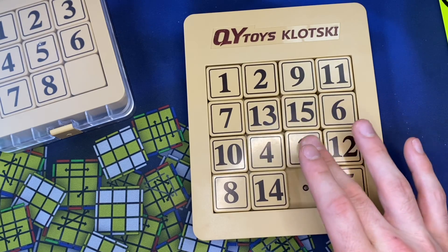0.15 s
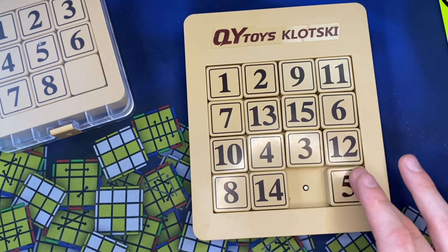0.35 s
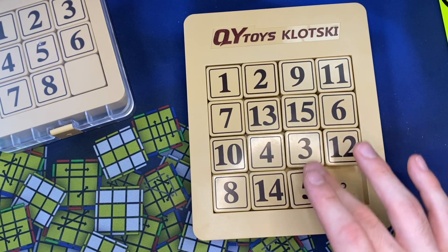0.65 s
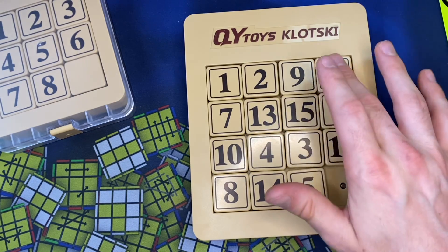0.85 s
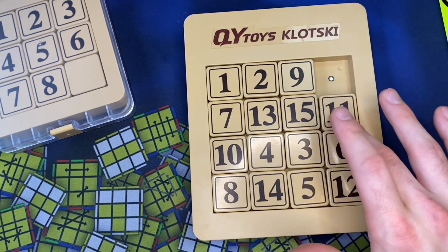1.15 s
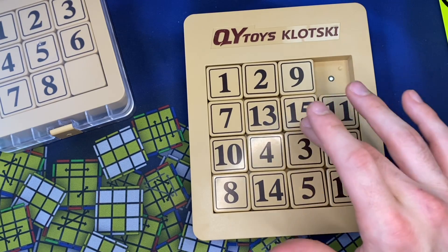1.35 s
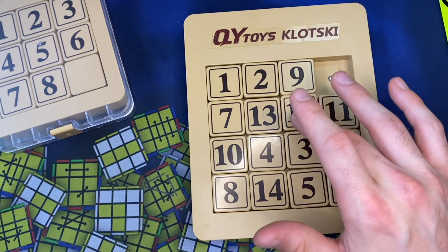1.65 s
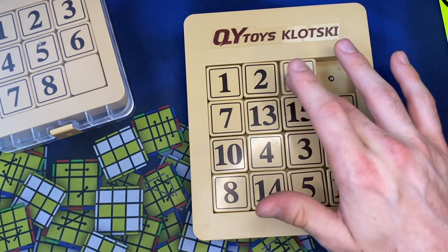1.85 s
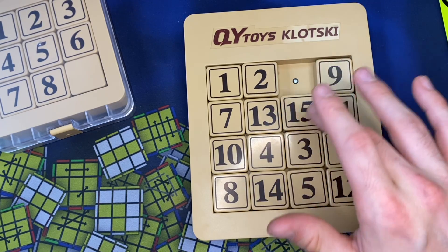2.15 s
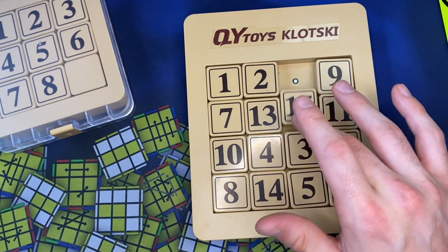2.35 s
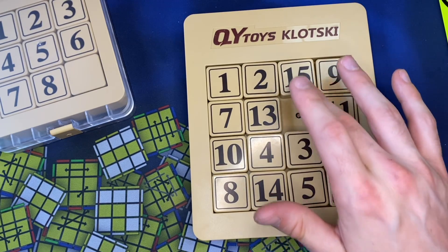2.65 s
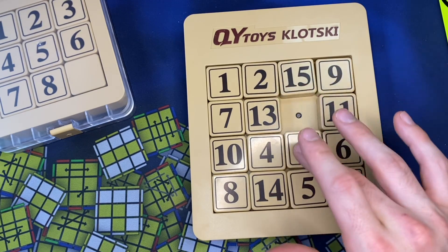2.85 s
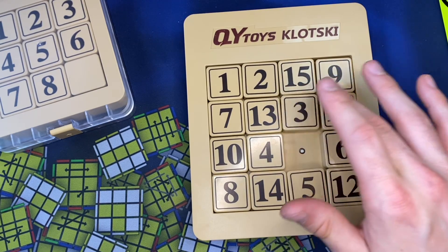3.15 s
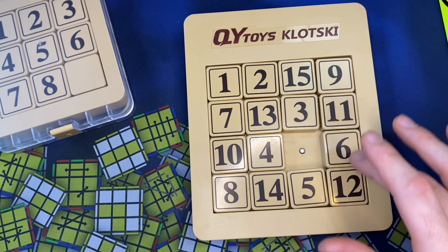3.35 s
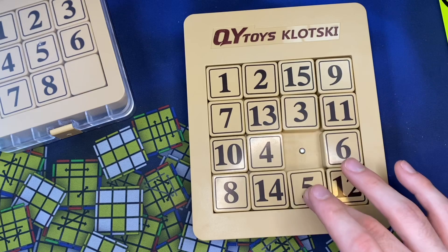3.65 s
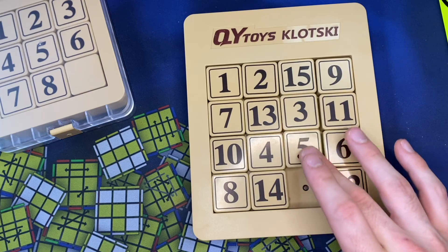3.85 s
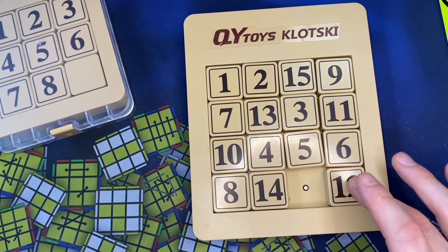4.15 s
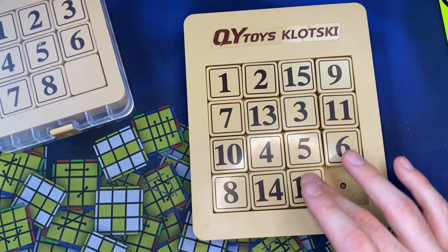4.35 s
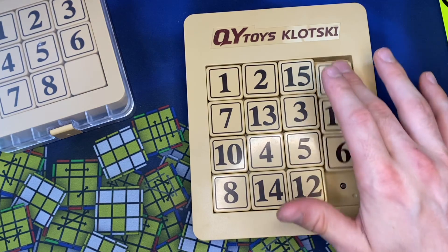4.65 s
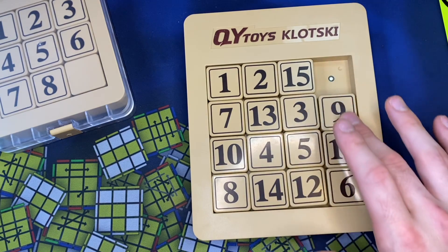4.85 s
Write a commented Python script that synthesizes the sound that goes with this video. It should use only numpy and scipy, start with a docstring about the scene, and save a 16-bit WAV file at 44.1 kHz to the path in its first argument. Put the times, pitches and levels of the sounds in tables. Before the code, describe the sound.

Close up in a small, quiet room, plastic tiles scrape and click in a sliding puzzle. The short slides come irregularly, about two a second, each ending in a small clack with a slightly hollow knock from the tray. Soft fingertip ticks and brushes fall between them, and the table gives faint dull thuds under the hand. A weak hum and hiss lie underneath.

```python
"""A table in a small quiet room: a finger pushes the plastic tiles of a sliding puzzle around their tray.
Each move is a light touch, a short gritty slide and a clack as the tiles meet each other and the frame.
The tray rings and flexes, the table thuds under the leaning hand, the walls throw the clicks back.
A low rumble, a weak hum and a faint hiss lie underneath."""
import sys
import numpy as np
from scipy import signal
from scipy.fft import rfft, irfft, next_fast_len
from scipy.io import wavfile

SR = 44100
rng = np.random.default_rng(int(sys.argv[2]) if len(sys.argv) > 2 else 0)


def file_out(sig):
    """Save sig as 16-bit WAV at sys.argv[1]."""
    # one column per channel
    cols = np.atleast_2d(sig).T
    # limit, then scale
    lim = np.clip(cols, -1, 1)
    pcm = np.round(lim * 32767).astype(np.int16)
    wavfile.write(sys.argv[1], SR, pcm)


N = 220411
TIME = np.arange(N) / SR

# One-place tile moves. Each row: start and end in seconds, rub and grit in relative dB,
# midway swell in dB (below 0 the tile runs free).
SLIDES = [(-.03, 0.084, -54, -55, -0.5), (0.423, 0.628, -56.5, -56.5, -4), (0.912, 1.099, -47.5, -50, -5),
          (1.871, 2.033, -52.5, -57, 2), (2.35, 2.511, -53.5, -56, 0.5), (2.888, 3.013, -48.5, -51, -7),
          (3.715, 3.851, -55, -51.5, 1), (4.215, 4.325, -51, -51, 2.5), (4.65, 4.782, -48, -52, -1)]
# A tile hits its neighbour, then the row seats on the frame. Each row: time and seating delay in seconds,
# first knock, first tick, seating knock and seating tick in relative dB, centre in Hz, tray thump in dB.
STOPS = [(0.0838, 0.0062, -55, -32, -34.5, -39.5, 2110, -53.5),
         (0.6317, 0.0046, -61.5, -60, -68, -70, 1770, -72),
         (1.086, 0.0079, -24, -25.5, -25.5, -34, 2250, -50),
         (2.021, 0.0077, -51.5, -62, -49.5, -62, 1510, -66.5),
         (2.505, .009, -30.5, -41, -36, -44, 1690, -50.5),
         (3.0126, .0055, -42, -42, -36.5, -49, 2080, -57.5),
         (3.8509, .009, -41.5, -41.5, -33, -40.5, 2186, -55.5),
         (4.3254, 0.0061, -41, -54, -52.5, -65, 1950, -63),
         (4.784, 0.0044, -28.5, -25, -22.5, -30, 2606, -54)]
# Modes of the loaded tray. Each row: frequency in Hz, relative level in dB.
TRAY_MODES = [(885, -5.5), (1023, -4), (1200, -3), (1303, -3), (1400, -2.5), (1475, -5), (1609, -2.5),
              (1730, -8), (1850, -10), (2010, -4), (2130, 1.5), (2266, 1.5), (2350, -5), (2510, -2.5),
              (2724, -3.5), (2885, -1)]
TRAY_T60_S = 0.039  # tiles and hand damp all modes alike
# Spectrum of rubbing in the tray. Each row: frequency in Hz, relative density in dB.
RUB_SPECTRUM = [(150, -28), (350, -17.5), (570, -25.5), (850, -3), (1200, -4), (1700, 1.5), (2400, -3.5),
                (3400, -2.5), (4200, -13.5), (5500, -27)]


def amp(db):
    """Decibels to gain."""
    return 10 ** (np.asarray(db) / 20)


def unit(x):
    """Scale to rms 1."""
    return x / np.sqrt(np.mean(x ** 2) + 1e-20)


def unit_attack(x, size=132):
    """Scale to rms 1 over the first size samples."""
    return x / np.sqrt(np.mean(x[:size] ** 2) + 1e-20)


def curve(points, hz):
    """Interpolate over log frequency."""
    points_hz, values = np.transpose(points)
    return np.interp(np.log(hz + 1), np.log(points_hz), values)


def add(mix, start_s, sound):
    """Mix a sound in at start_s."""
    part = mix[max(round(start_s * SR), 0):][:len(sound)]
    part += sound[:len(part)]


def colour(x, spectrum, size=4096):
    """Minimum-phase filter: nothing sounds ahead of a click."""
    log_gain = np.log(amp(curve(spectrum, abs(np.fft.fftfreq(size, 1 / SR)))))
    taps = np.fft.ifft(np.exp(np.conj(signal.hilbert(log_gain)))).real
    return signal.fftconvolve(x, taps[:size // 2])[:len(x)]


def wander(rate_hz, size=8192):
    """Random drift of rms 1, up to about rate_hz."""
    lowpass = np.exp(-(np.fft.rfftfreq(size, TIME[-1] / size) / rate_hz) ** 2)
    drift = irfft(rfft(rng.standard_normal(size)) * lowpass)
    return np.interp(TIME, np.linspace(0, TIME[-1], size), unit(drift))


def air(noise_db=-65.5, hum_hz=87, hum_db=-71, waver=0.16):
    """Room rumble and hiss with a weak, wavering hum."""
    # Room noise. Each row: frequency in Hz, relative density in dB.
    air_spectrum = [(12, -23.5), (20, 1), (70, -6.5), (154, -18.5), (234, -17.5), (399, -28.5), (678, -31),
                    (923, -28), (1090, -29), (1190, -24.5), (1960, -36.5), (2670, -36), (3840, -44.5),
                    (7310, -41.5), (16000, -44.5)]
    hum = np.sin(2 * np.pi * hum_hz * TIME) * (1 + waver * wander(rate_hz=2.4))
    return amp(noise_db) * unit(colour(rng.standard_normal(N), air_spectrum)) + amp(hum_db) * hum


def echoes(first_s=0.0012, build_s=0.00097, echoes_per_s=9000):
    """Dense wall echoes of energy 1; each band dies at its own rate."""
    # Room decay. Each row: frequency in Hz, T60 in seconds.
    room_t60 = [(200, 0.34), (700, .2), (1500, 0.21), (3000, 0.2), (7000, 0.22), (11000, 0.19),
                (16000, 0.14)]
    # Echo colour. Each row: frequency in Hz, relative gain in dB.
    room_colour = [(200, -1), (600, 5.5), (1000, -0.5), (2000, -4.5), (4000, 2), (7000, -3.5), (11000, 1.5),
                   (15000, -2)]
    t = np.arange(SR // 2) / SR
    taps = rng.choice([-1., 1.], len(t)) * (rng.random(len(t)) < echoes_per_s / SR)
    hz, frame_s, frames = signal.stft(taps, SR, nperseg=256)
    gain_db = curve(room_colour, hz)[:, None] - 60 * frame_s / curve(room_t60, hz)[:, None]
    tail = signal.istft(frames * amp(gain_db), SR, nperseg=256)[1][:len(t)]
    tail *= np.clip((t - first_s) / build_s, 0, 1)
    return tail / np.linalg.norm(tail)


def room(x, wet_db=-6, tails=3, crossfade_hz=21):
    """Several random echo tails crossfade, so the room sounds smooth, with no ring at fixed pitches."""
    phase = 2 * np.pi * crossfade_hz * TIME
    shares = (np.sqrt(2 / tails) * np.cos(phase + np.pi * k / tails) for k in range(tails))
    return amp(wet_db) * sum(signal.fftconvolve(x * share, echoes())[:N] for share in shares)


def rocking(resting_db=-71):
    """Dull table thuds swell as the hand leans on the tray and rocks it."""
    # Leans of the hand. Each row: middle and length in seconds, level in dB.
    leans = [(.91, 0.21, -58.5), (1.517, 0.24, -62.5), (1.924, 0.54, -62.5), (3.019, 0.099, -61.5),
             (4.001, 0.68, -64.5), (4.68, 0.3, -63.5)]
    # Table thud. Each row: frequency in Hz, relative density in dB.
    thud_spectrum = [(20, -24.5), (40, -10), (55, 3), (75, -4.5), (110, -8), (200, -29.5), (400, -52.5)]
    weight = np.full(N, amp(resting_db))
    for middle_s, length_s, db in leans:
        add(weight, middle_s - length_s / 2, amp(db) * np.hanning(int(length_s * SR)))
    return weight * unit(colour(rng.standard_normal(N), thud_spectrum))


def brushes():
    """Skin on smooth plastic: a swell of high hiss, with some rubbing as a tile gives."""
    # Fingertip strokes. Each row: start and length in seconds, skin hiss and tray rub in dB.
    strokes = [(0.349, 0.04, -68, -63.5), (0.423, 0.018, -58, -79), (2.82, 0.095, -76, -83.5),
               (3.564, 0.12, -75.5, -83), (3.681, 0.022, -71.5, -68), (4.105, 0.063, -72.5, -87),
               (4.199, 0.016, -60, -68), (4.597, 0.029, -62, -65.5)]
    # Skin hiss. Each row: frequency in Hz, relative density in dB.
    skin_spectrum = [(2000, -8), (4500, -7), (7000, 7.5), (11000, -2), (15000, -9)]
    hiss_gain, rub_gain = np.zeros((2, N))
    for start_s, length_s, hiss_db, rub_db in strokes:
        swell = np.sin(np.linspace(0, np.pi, int(length_s * SR)))
        add(hiss_gain, start_s, amp(hiss_db) * swell)
        add(rub_gain, start_s, amp(rub_db) * swell)
    hiss = unit(colour(rng.standard_normal(N), skin_spectrum))
    rub = unit(colour(rng.standard_normal(N), RUB_SPECTRUM))
    return hiss_gain * hiss + rub_gain * rub


def ring(modes, t60_s, spread=0.095, detune=0.02, rise_s=0.00097, size=4096):
    """Modes of a struck object; strike spot and hand load set each one's sign, share and pitch."""
    t = np.arange(size) / SR
    hz, db = np.transpose(modes)
    share = rng.choice([-1, 1], len(hz)) * (1 + spread * rng.standard_normal(len(hz)))
    hz = hz * (1 + detune * rng.standard_normal(len(hz)))
    swell = np.sin(np.pi / 2 * np.minimum(t / rise_s, 1)) ** 2
    return (share * amp(db)) @ np.sin(2 * np.pi * np.outer(hz, t)) * swell * amp(-60 * t / t60_s)


def thumps(t60_s=0.047, lag_s=0.003):
    """The tray flexes as a whole at each stop: a short, hollow thump."""
    # Flexing of frame and tray. Each row: frequency in Hz, relative level in dB.
    flex_modes = [(240, -18.5), (300, -11), (390, -8.5), (470, -19.5), (760, -2), (830, 2), (910, 1.5),
                  (1010, -3.5)]
    out = np.zeros(N)
    for start_s, *_, db in STOPS:
        add(out, start_s + lag_s, amp(db) * unit_attack(ring(flex_modes, t60_s, rise_s=0.0015), size=880))
    return out


def friction(catches_per_s=1500, spread_db=1.5, hiss_gain=0.66, judder_db=1.2, judder_hz=99):
    """Tiny catches of plastic on plastic over a smooth hiss; the finger's push judders."""
    strength = amp(spread_db * np.minimum(rng.exponential(1, N), 4)) * rng.choice([-1, 1], N)
    catches = unit(strength * (rng.random(N) < catches_per_s / SR))
    return (catches + hiss_gain * rng.standard_normal(N)) * amp(judder_db * wander(judder_hz))


def rasp(x, shift_db, shift_hz):
    """Contact points change as the tile travels, bringing out one band after another."""
    bands_hz = [900, 1400, 2100, 3200, 5500, 7000, 8800, 13000]
    size = 2 * next_fast_len(N // 2 + 1)
    spectrum, hz = rfft(x, size), np.fft.rfftfreq(size, 1 / SR)
    masks = (curve(np.c_[bands_hz, row], hz) for row in np.eye(len(bands_hz)))
    bands = (irfft(spectrum * mask)[:N] for mask in masks)
    return unit(sum(band * amp(shift_db * wander(shift_hz)) for band in bands))


def slides(gain_db=-3, ring_db=-6, rise_s=0.024, fall_s=0.0033):
    """Friction drives tray and tile: it sets in, binds or eases midway and ends at the stop."""
    # Grit of the tile edges. Each row: frequency in Hz, relative density in dB.
    grit_spectrum = [(3000, -33), (4400, -5), (5500, 1.5), (6800, 3), (8500, 0), (10200, -13.5),
                     (13000, -12), (16000, -24)]
    drive = friction()
    scrape = rasp(colour(drive, RUB_SPECTRUM), shift_db=1.5, shift_hz=21)
    grit = rasp(colour(drive, grit_spectrum), shift_db=1.6, shift_hz=26)
    out = np.zeros(N)
    for start_s, end_s, rub_db, grit_db, swell_db in SLIDES:
        gate = np.clip(np.minimum((TIME - start_s) / rise_s, (end_s - TIME) / fall_s) + 0.5, 0, 1)
        moving = gate > 0
        travel = (TIME[moving] - start_s) / (end_s - start_s)
        push = gate[moving] * amp(gain_db + swell_db * np.sin(np.pi * travel) ** 2)
        # each tile rubs another part of the tray
        ringing = signal.fftconvolve(scrape[moving], ring(TRAY_MODES, TRAY_T60_S))[:moving.sum()]
        rub = unit(unit(scrape[moving]) + amp(ring_db) * unit(ringing))
        out[moving] += push * (rub * amp(rub_db) + unit(grit[moving]) * amp(grit_db))
    return out


def chatter(hold_s, rise_s, tail_db, tail_t60_s, size=4096):
    """Two faces buzz together with a flat spectrum, then settle."""
    t = np.arange(size) / SR
    flat_noise = irfft(np.exp(2j * np.pi * rng.random(size // 2 + 1)))
    buzz = unit(flat_noise[:int(hold_s * SR / 2) + 2])
    tail = rng.standard_normal(size) * amp(tail_db - 60 * t / tail_t60_s) * (t > hold_s)
    return (np.pad(buzz, (0, size - len(buzz))) + tail) * np.minimum(t / rise_s, 1)


def contact(knock_db, tick_db, centre_hz, sharp_db, dull_db_per_oct=8, thin_db_per_oct=6):
    """One contact knocks the tray and ticks in the small tile; harder ones centre higher."""
    # Crack in the tray. Each row: frequency in Hz, relative density in dB.
    crack_spectrum = [(100, -42), (300, -30), (600, -25.5), (850, 0), (1250, -2.5), (2300, -3),
                      (2900, -2.5), (3400, -3.5), (4300, -7), (5500, -29.5)]
    # Tick in the tile. Each row: frequency in Hz, relative density in dB.
    tick_spectrum = [(3000, -25.5), (4600, -12), (5500, -5.5), (6800, -1.5), (8000, -4.5), (9200, -5),
                     (10200, -10.5), (12500, -9.5), (16000, -16)]
    crack = colour(chatter(hold_s=0.004, rise_s=0.0008, tail_db=-8.5, tail_t60_s=0.03), crack_spectrum)
    tray = amp(-5) * unit_attack(ring(TRAY_MODES, TRAY_T60_S), size=220)
    # the contact favours modes near its centre
    bands_hz = np.geomspace(100, 16000, 30)
    octaves = np.log2(bands_hz / centre_hz)
    tilt_db = -dull_db_per_oct * np.maximum(octaves, 0) + thin_db_per_oct * np.clip(octaves, -2, 0)
    knock = unit_attack(colour(unit_attack(crack) + tray, np.c_[bands_hz, tilt_db]))
    # the tile rocks on the contact point for a few cycles
    clack = amp(-3) * unit_attack(ring([(centre_hz, 0)], t60_s=0.013))
    buzz = chatter(hold_s=0.003, rise_s=0.00089, tail_db=-5, tail_t60_s=0.036)
    # a corner ticks sharper than a flat face
    tick = colour(colour(buzz, tick_spectrum), [(7500, 0), (11500, sharp_db)])
    return amp(knock_db) * unit_attack(knock + clack) + amp(tick_db) * unit_attack(tick)


def snags(knock_gain_db=-3, tick_gain_db=-4, scatter_db=0.5, centre_hz=1900, scatter_oct=0.53, count=4):
    """A moving tile catches on its neighbours at random, as strongly as it rubs."""
    out = np.zeros(N)
    for start_s, end_s, rub_db, grit_db, swell_db in SLIDES:
        places = (np.arange(count) + rng.random(count)) / count
        scatter = np.clip(rng.standard_normal((count, 3)), -1.5, 1.5)
        for place, (knock_dip, tick_dip, hardness) in zip(places, scatter):
            snag = contact(rub_db + knock_gain_db - scatter_db * knock_dip,
                           grit_db + tick_gain_db - scatter_db * tick_dip,
                           centre_hz * 2 ** (scatter_oct * hardness), sharp_db=-2)
            push = amp(swell_db * np.sin(np.pi * place) ** 2)
            add(out, start_s + place * (end_s - start_s), snag * push)
    return out


def clicks(knock_gain_db=-4.5):
    """A finger lands, or a tile breaks loose or snags; the more knock over tick, the duller."""
    # Light contacts. Each row: start in seconds, tray knock and edge tick in relative dB, centre in Hz.
    touches = [(0.061, -61, -51, 2400), (0.1143, -39.5, -64, 1330), (0.328, -54.5, -68, 1830),
               (0.3724, -43.5, -58.5, 1540), (0.4254, -56, -42, 2660), (0.7107, -72, -76, 2150),
               (.867, -49.5, -72, 1430), (.9045, -37.5, -53, 1540), (0.91, -38, -50, 1410),
               (0.9198, -69, -39, 1480), (0.9418, -41, -58, 1940), (.949, -39.5, -39.5, 1780),
               (1.0642, -64.5, -40, 2156), (1.4592, -42.5, -66, 1650), (1.4685, -45.5, -64.5, 1837),
               (1.6665, -72, -72, 1500), (1.8288, -64, -72.5, 1250), (1.876, -60, -49, 2420),
               (1.8951, -66, -42.5, 1990), (1.9389, -42, -62, 1660), (2.04, -48.5, -59.5, 1900),
               (2.3687, -62, -45, 1820), (2.48, -41.5, -44, 1306), (2.6355, -57.5, -72.5, 1850),
               (2.9462, -46, -66.5, 1727), (3.0102, -42, -39, 3020), (3.7003, -51, -41.5, 2240),
               (3.7457, -45, -71, 1070), (4.1784, -63.5, -85, 1020), (4.2083, -54, -42.5, 2370),
               (4.2303, -53, -45.5, 2930), (4.6149, -52, -47.5, 1650), (4.6441, -35.5, -51, 1130),
               (4.6488, -39.5, -46.5, 1690), (4.6655, -66, -41, 1890), (4.682, -77, -38.5, 2100),
               (4.7089, -36.5, -53, 2080), (4.769, -54.5, -37.5, 1900), (4.7747, -37, -49, 1850)]
    out = np.zeros(N)
    for start_s, knock_db, tick_db, centre_hz in touches:
        soft_db = knock_db - tick_db
        click = contact(knock_db + knock_gain_db, tick_db, centre_hz,
                        sharp_db=-2 - 0.15 * soft_db, dull_db_per_oct=9 + 0.18 * soft_db)
        add(out, start_s, click)
    return out


def stops(knock_gain_db=-1, light_tick_db=-43, rebound_s=0.0052, knock_loss_db=7, tick_loss_db=5):
    """A tile hits its neighbour, the harder the flatter; the row seats on the frame and rattles."""
    out = np.zeros(N)
    for start_s, delay_s, knock_db, tick_db, seat_knock_db, seat_tick_db, centre_hz, _ in STOPS:
        sharp_db = -0.8 * max(tick_db - light_tick_db, 0)
        add(out, start_s, contact(knock_db + knock_gain_db, tick_db, centre_hz, sharp_db))
        bounce_s = start_s + delay_s
        for k in range(4):  # each bounce sooner and weaker
            bounce = contact(seat_knock_db + knock_gain_db - k * knock_loss_db,
                             seat_tick_db - k * tick_loss_db, centre_hz, sharp_db=-4)
            add(out, bounce_s, bounce)
            bounce_s += rebound_s * 0.9 ** k
    return out


def scene():
    """The puzzle close by, its echoes and the background, in mono."""
    puzzle = clicks() + stops() + thumps() + slides() + snags() + brushes()
    return (puzzle + room(puzzle) + rocking() + air())[None]


def record(dry):
    """Steep low-pass at 16.2 kHz."""
    lowpass = signal.firwin(401, 16200, window=("kaiser", 9), fs=SR)
    return signal.oaconvolve(dry, lowpass[None], "same")


dry = scene()
out = record(dry)
file_out(out)
```